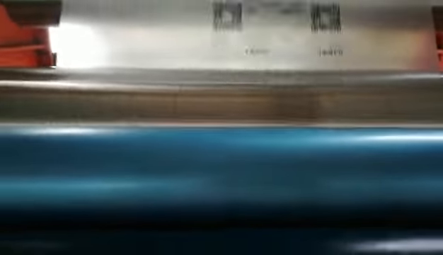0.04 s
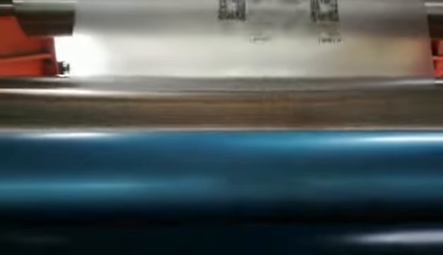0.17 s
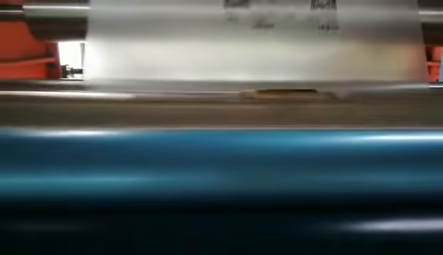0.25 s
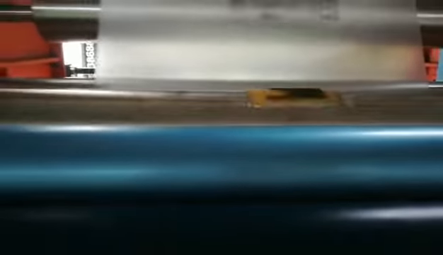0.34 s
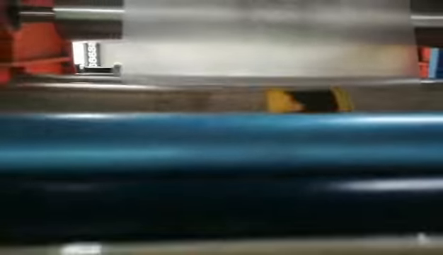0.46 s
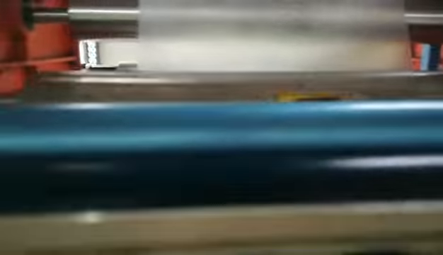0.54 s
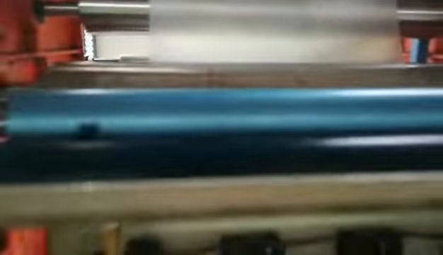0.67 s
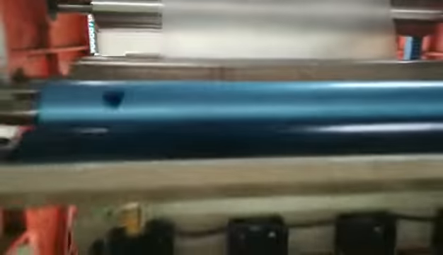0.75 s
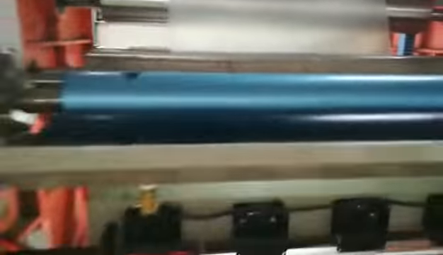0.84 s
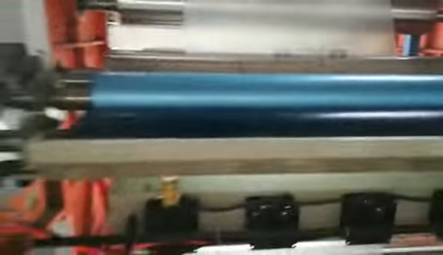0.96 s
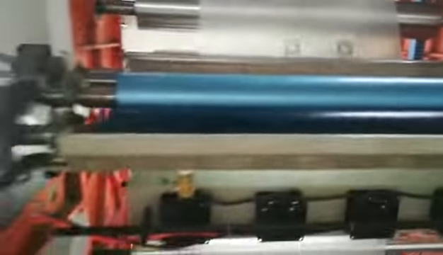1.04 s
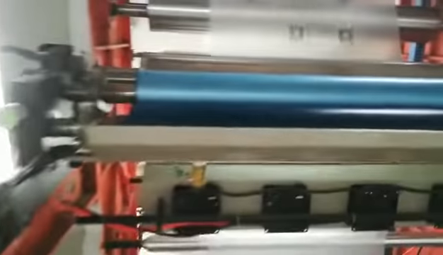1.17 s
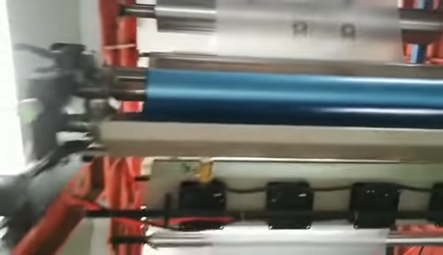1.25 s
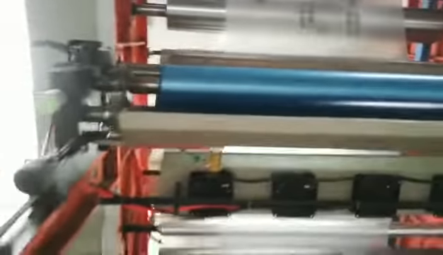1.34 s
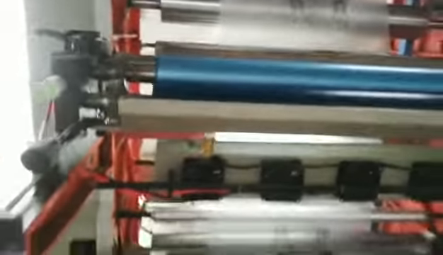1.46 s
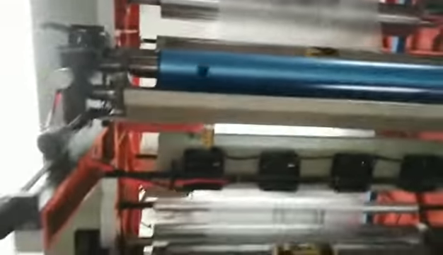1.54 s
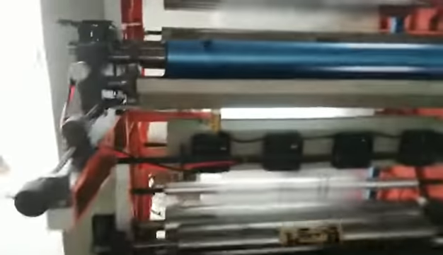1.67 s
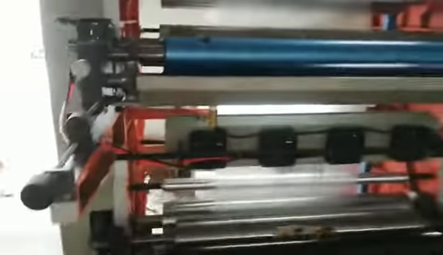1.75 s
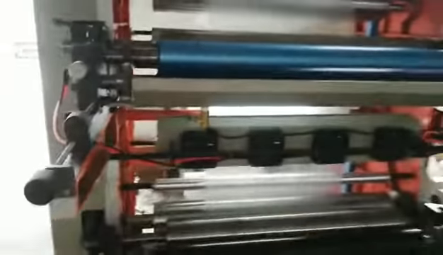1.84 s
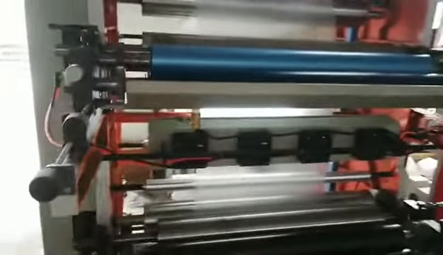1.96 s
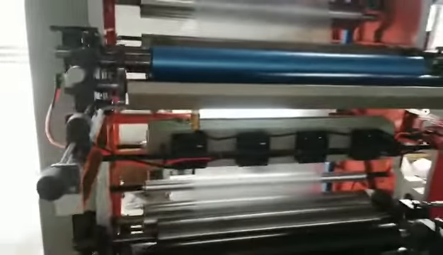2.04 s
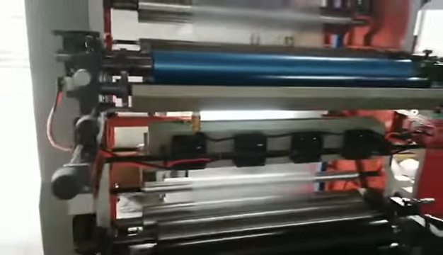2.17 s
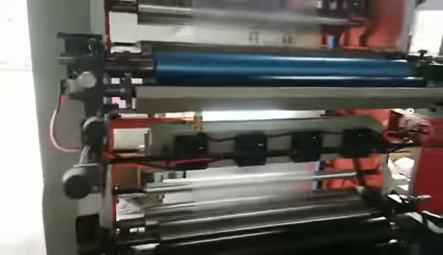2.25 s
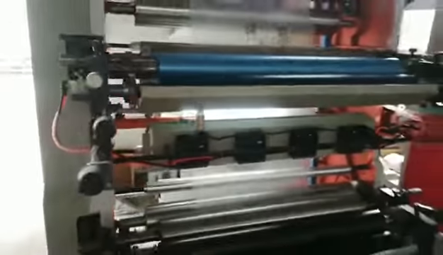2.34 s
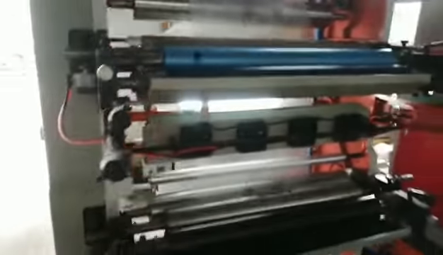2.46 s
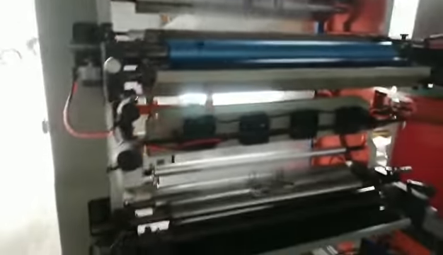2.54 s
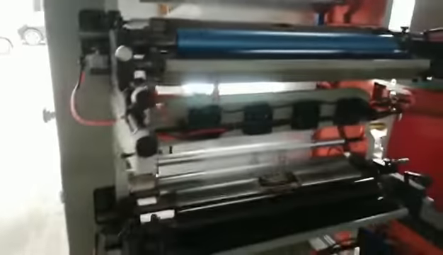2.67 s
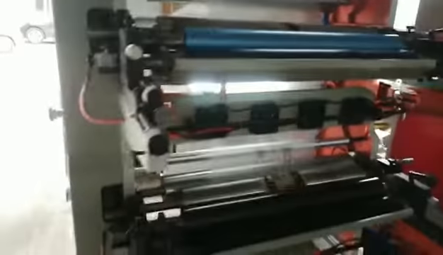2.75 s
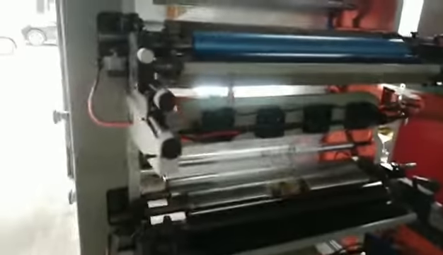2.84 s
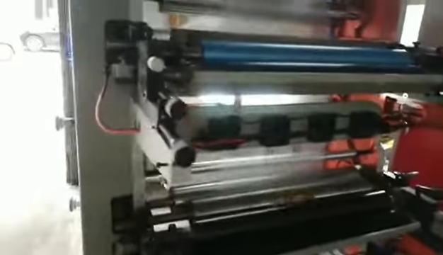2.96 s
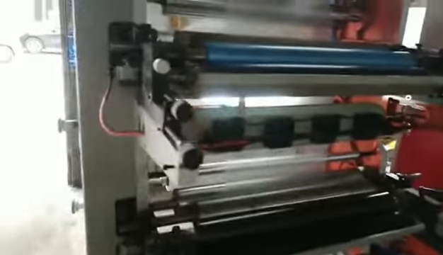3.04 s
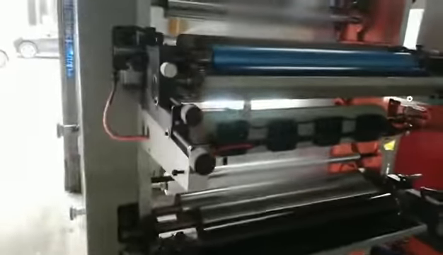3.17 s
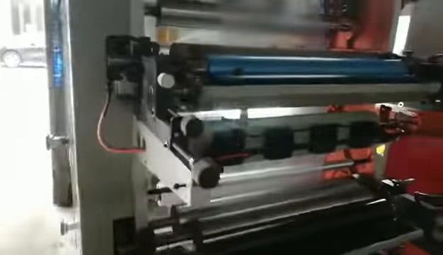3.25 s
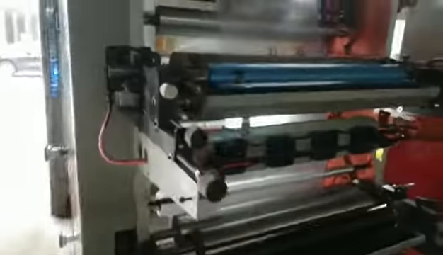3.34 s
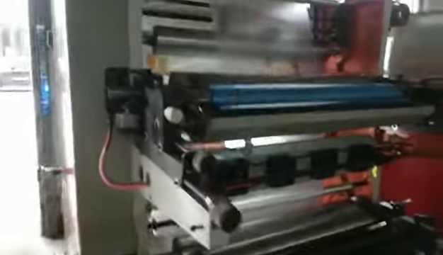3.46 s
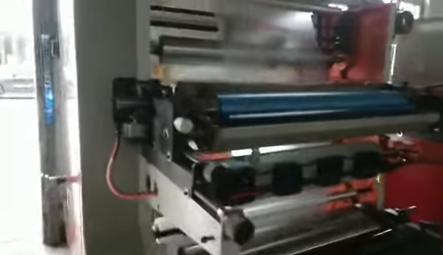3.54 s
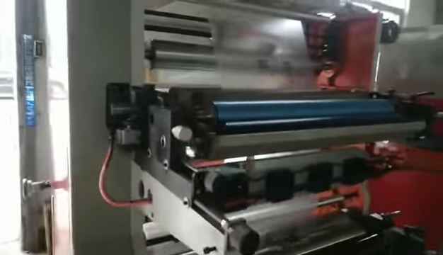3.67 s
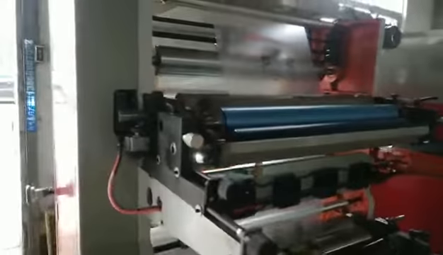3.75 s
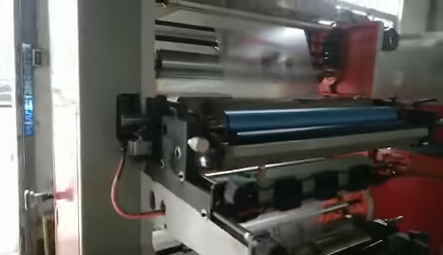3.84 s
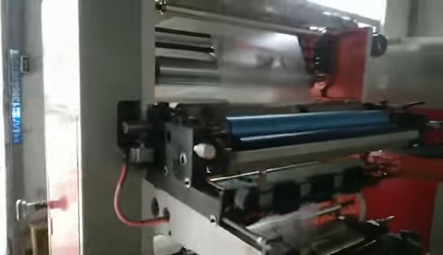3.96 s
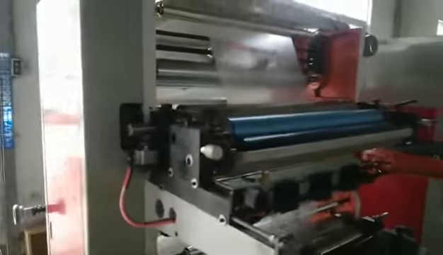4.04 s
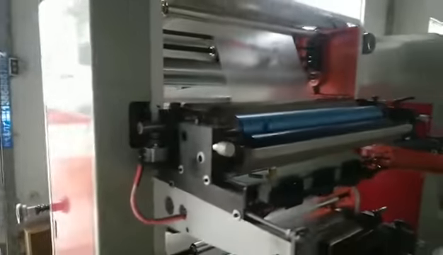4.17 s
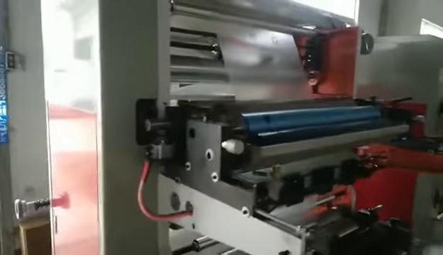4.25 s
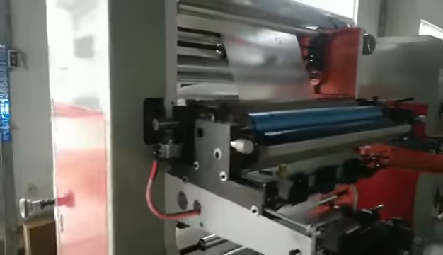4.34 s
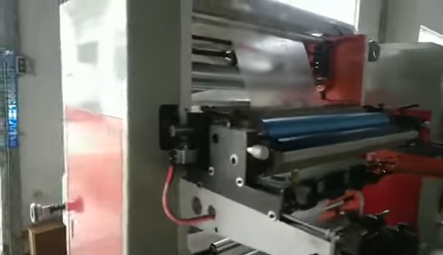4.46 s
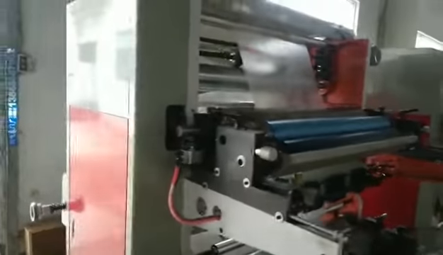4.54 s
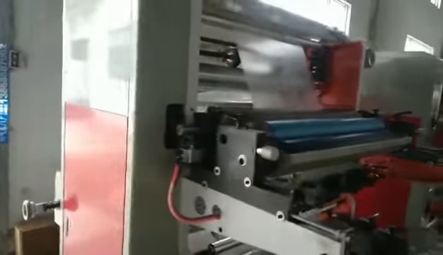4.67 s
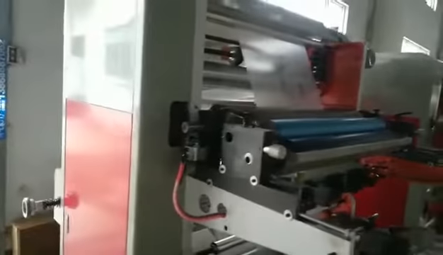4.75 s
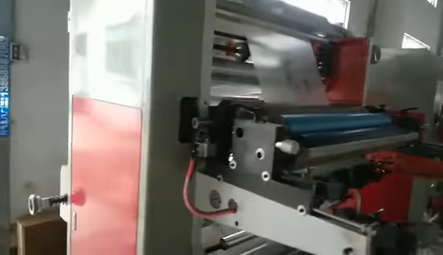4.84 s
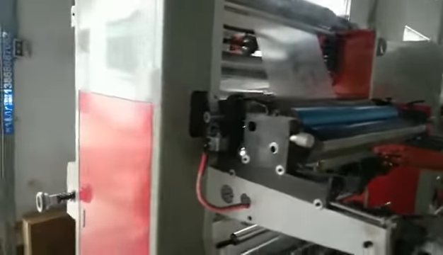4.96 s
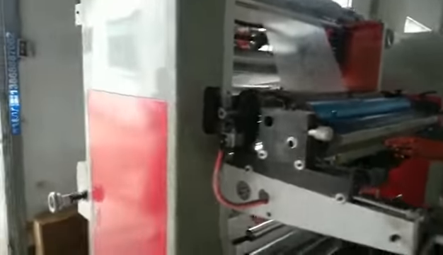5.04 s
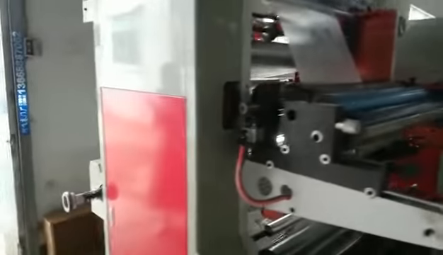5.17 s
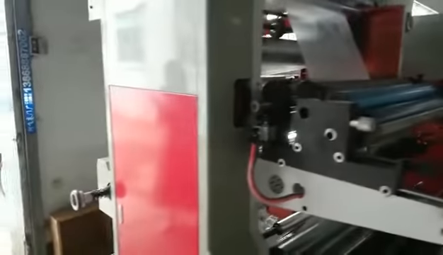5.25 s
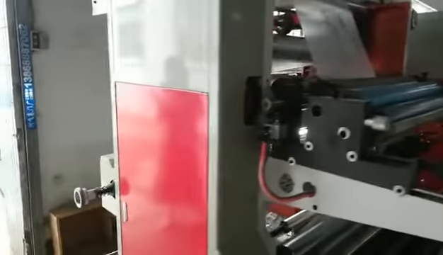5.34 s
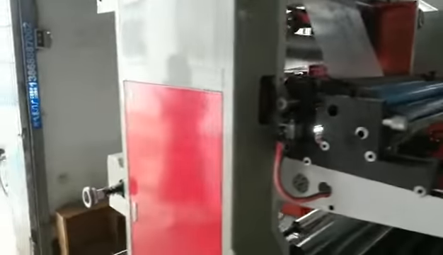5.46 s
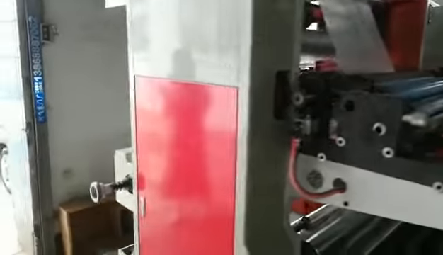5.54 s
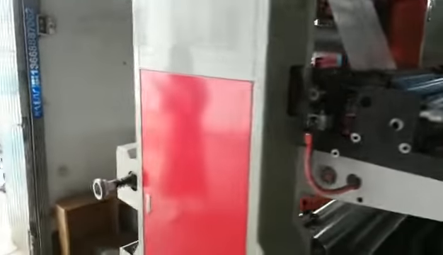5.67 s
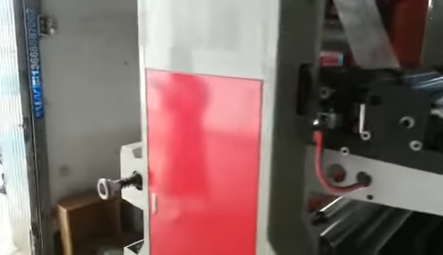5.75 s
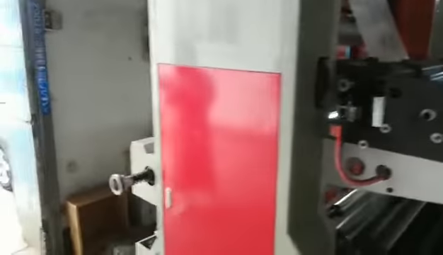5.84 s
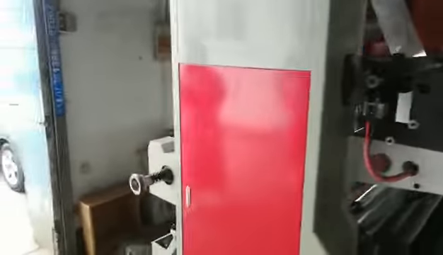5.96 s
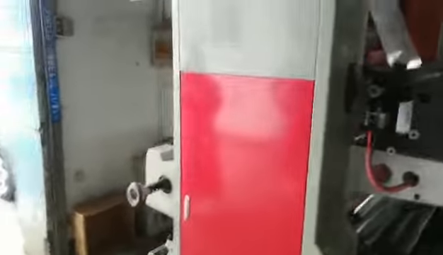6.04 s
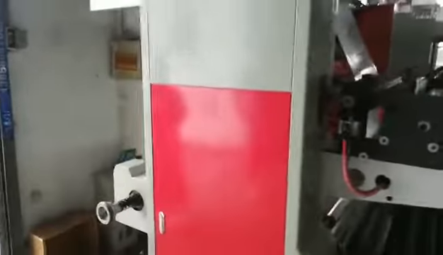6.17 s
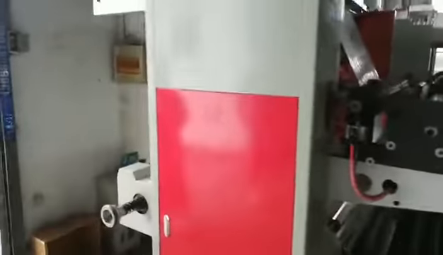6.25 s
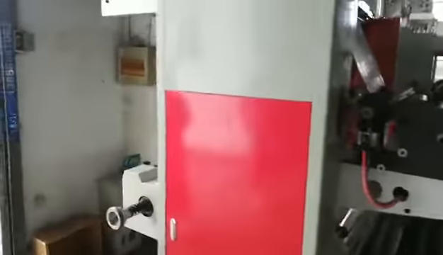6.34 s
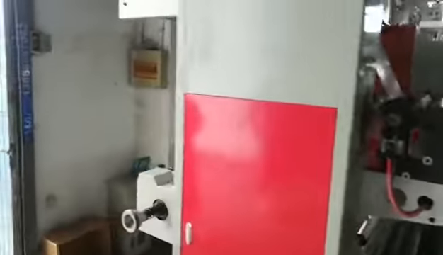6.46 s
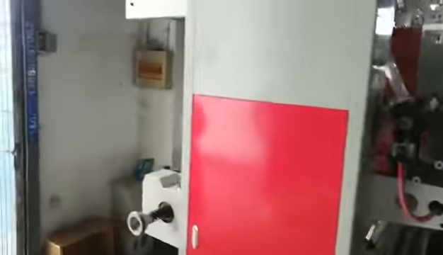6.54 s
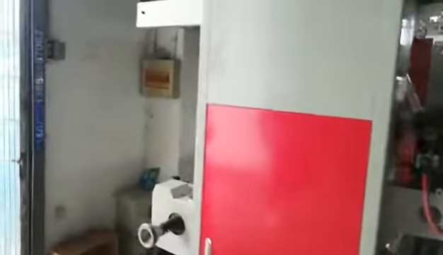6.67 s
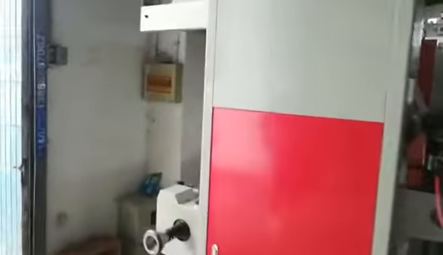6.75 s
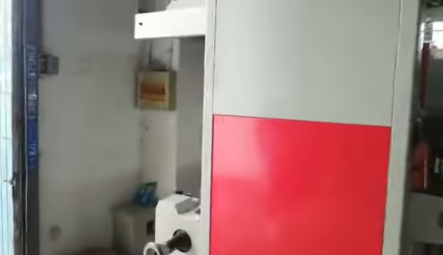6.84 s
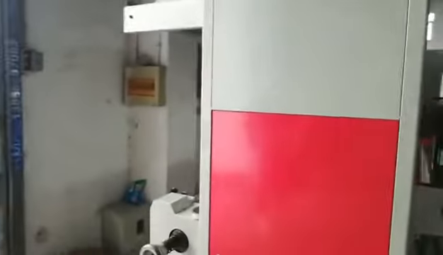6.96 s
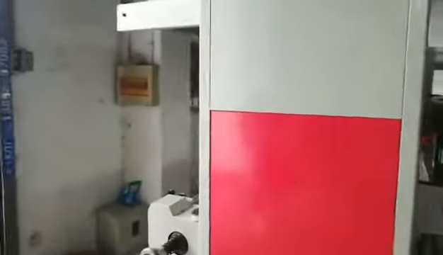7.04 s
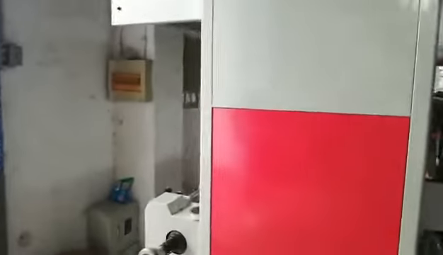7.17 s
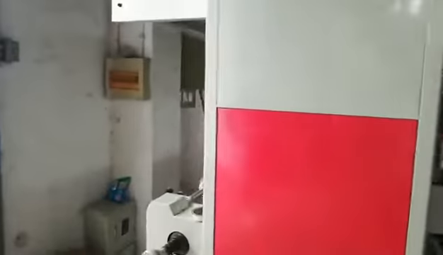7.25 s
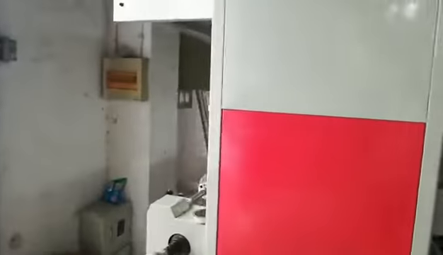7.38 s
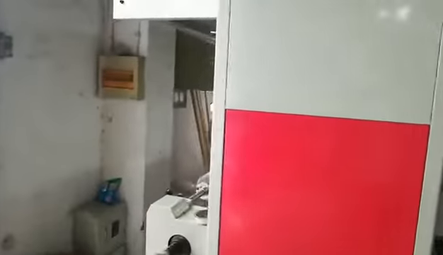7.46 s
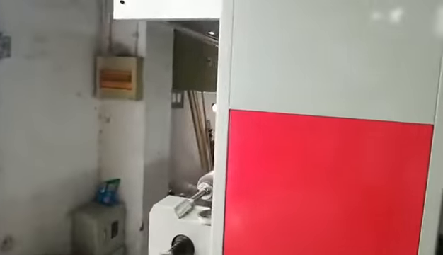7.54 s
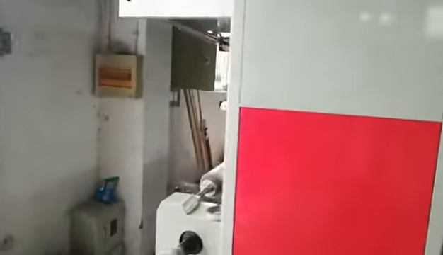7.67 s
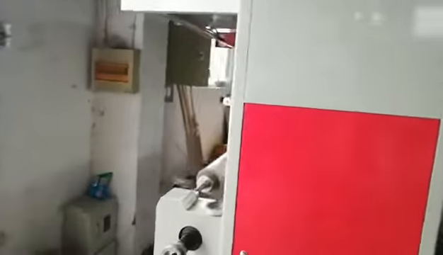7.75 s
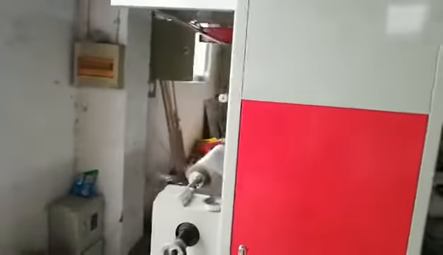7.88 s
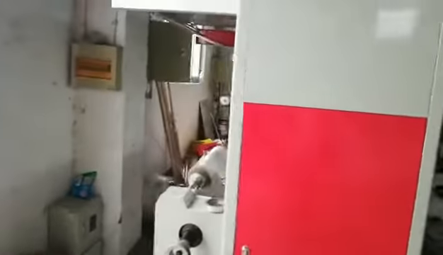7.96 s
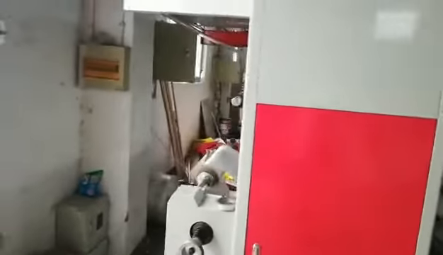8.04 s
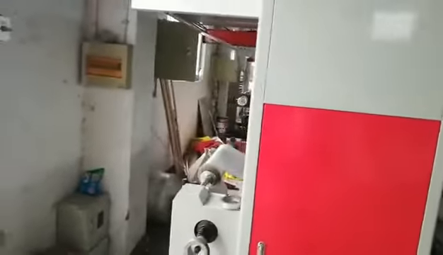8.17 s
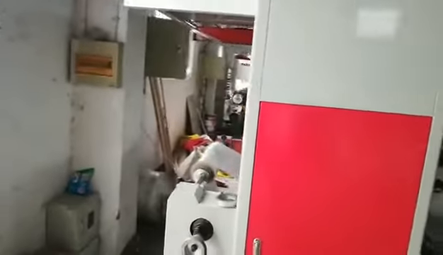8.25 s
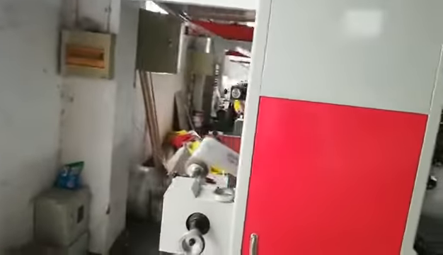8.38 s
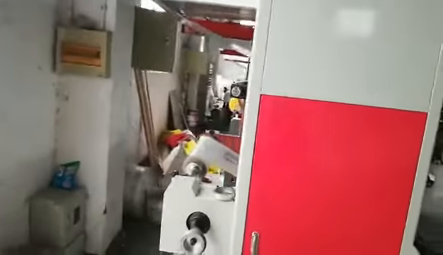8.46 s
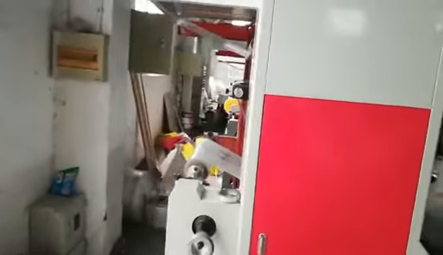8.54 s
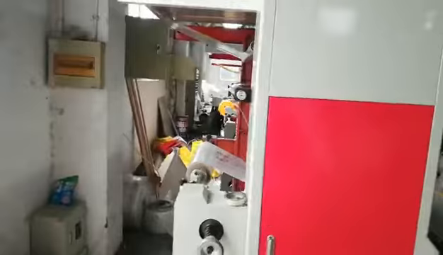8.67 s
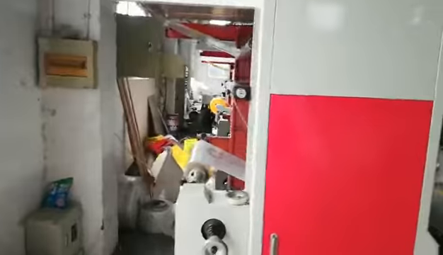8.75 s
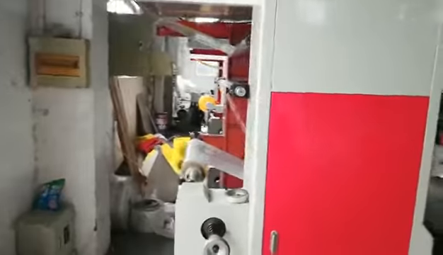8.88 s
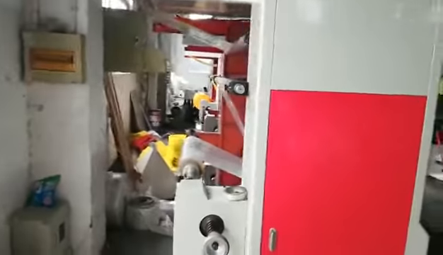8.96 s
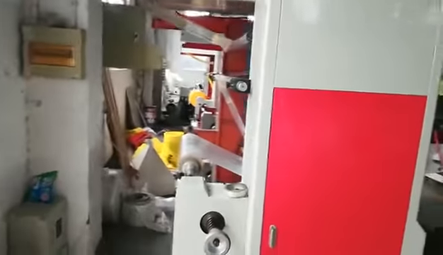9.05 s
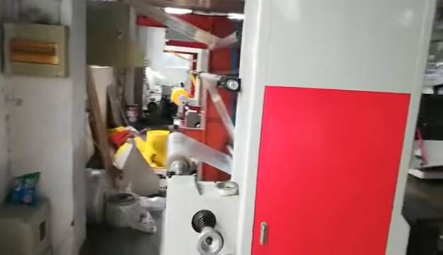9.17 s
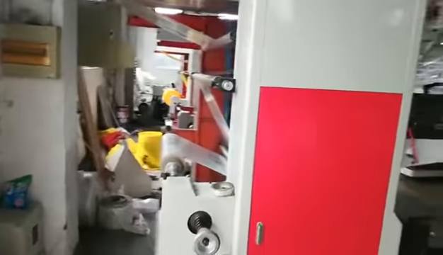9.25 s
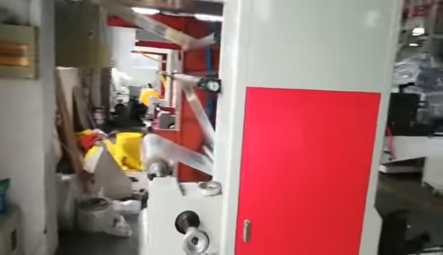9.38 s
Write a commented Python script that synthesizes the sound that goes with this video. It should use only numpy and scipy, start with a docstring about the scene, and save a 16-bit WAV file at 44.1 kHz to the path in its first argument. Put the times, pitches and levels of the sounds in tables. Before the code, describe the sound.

A film printing press hums and roars steadily in a workshop, its throbbing hum easing as the microphone backs away, with thin whine and brief roller squeaks.

```python
"""A loud hum throbs in the roar of a film printing press, then eases as the microphone backs off the rollers.
Shaft-order sines make the hum, which sags with each turn of the printing cylinder; shaped noise makes
the frame's rumble, the roar of bearings and gears, and the film's hiss. Dry-roller squeaks are short fuzzy tones.
The inverter whines, a fan drones, and a lower drone rises. Later the microphone passes behind a steel cabinet.
"""
import sys
import numpy as np
from scipy import signal
from scipy.fft import rfft, irfft
from scipy.io import wavfile
from scipy.ndimage import uniform_filter1d

SR = 44100
rng = np.random.default_rng(int(sys.argv[2]) if len(sys.argv) > 2 else 0)


def pcm_store(signal):
    """Save signal as 16-bit PCM."""
    levels = np.round(np.clip(np.atleast_2d(signal), -1, 1) * 32767)
    wavfile.write(sys.argv[1], SR, levels.astype(np.int16).T)


N = 414981
T = np.arange(N) / SR
FRAME_T = np.arange(N // 512 + 5) * 512 / SR
BIN_HZ = np.fft.rfftfreq(2048, 1 / SR)
BACKED_OFF_S = 3.4


# Machinery loudness along the walk, before trims. Each row: time in seconds, roar in dB, film hiss in dB.
WALK_LEVELS = [(0, -29, -32.5), (1.3, -30.5, -34), (3.3, -32, -35.5), (5, -32, -35.5), (6.5, -33, -37),
               (8.5, -33.5, -38), (9.41, -33, -37.5)]
# Frame rumble spectrum. Each row: frequency in Hz, relative density in dB.
FRAME_SPECTRUM = [(10, -24), (25, -6.5), (45, -3.5), (70, -3), (105, 0), (150, 2), (200, 3), (260, -0.5),
                  (330, -2.5), (400, -3), (520, -13.5), (900, -37)]
# Bearing and gear roar spectrum. Each row: frequency in Hz, relative density in dB.
ROLLER_SPECTRUM = [(200, -33), (400, -5), (520, 1), (610, 2), (850, 1), (1050, 1), (1350, -1), (1620, -0.5),
                   (1900, -3), (2100, -3.5), (2500, -9), (3000, -13.5), (4500, -36)]
# Film hiss spectrum. Each row: frequency in Hz, relative density in dB.
FILM_SPECTRUM = [(1800, -25.5), (2600, -10.5), (3100, -7), (3700, -1), (4300, -3), (4800, -1.5),
                 (5350, -4.5), (5900, -3), (6250, 0.5), (6420, -2), (6800, 1), (7050, -3), (7450, -7.5),
                 (8000, -24)]


def machinery(frame_trim_db=-1.07, frame_fade_db_per_s=0.22, rollers_trim_db=-0.3, film_trim_db=-0.05,
              chatter_db=0.5, flap_db=0.52):
    """The frame rumbles, bearings and gears roar and chatter, and flapping film hisses off the rollers."""
    roar_db, hiss_db = curve(WALK_LEVELS, T)
    frame_db = roar_db + frame_trim_db - frame_fade_db_per_s * T
    rollers_db = roar_db + rollers_trim_db + chatter_db * wander(rate_hz=65)
    film_db = hiss_db + film_trim_db + flap_db * wander(rate_hz=32)
    frame = rush(FRAME_SPECTRUM, frame_db, patchy_db=1, ripple_db=1.5)
    rollers = rush(ROLLER_SPECTRUM, rollers_db, patchy_db=1.0, ripple_db=1.83)
    film = rush(FILM_SPECTRUM, film_db, patchy_db=1.5, ripple_db=2.0)
    return frame + rollers + film


# Likeness of the two ports. Each row: frequency in Hz, base correlation, phase lag of the left port in rad.
PORT_LIKENESS = [(50, .997, 0), (100, .98, 0), (150, .88, .05), (220, .85, .05), (330, .84, .15),
                 (440, .55, 1), (580, .5, 1.45), (780, .2, 0), (1100, .5, -.15), (1600, .47, -.15),
                 (1880, .05, 0), (2200, .04, 0), (3900, .005, 0), (7500, .002, 0)]
# Direction of low sound. Each row: time in seconds, nominal left-port lag in s, diffuseness (1 = usual).
BEARING_PATH = [(0, 0, 1.5), (.7, 0, 0.96), (1.3, 0.00057, 1), (2.3, 0, 0.83), (3.4, 0, .6),
                (4.5, 0.000025, 0.82), (5.3, 0, 1.1), (6.2, 0.00026, 1.9), (7.25, 0.00047, 1.7),
                (7.8, 0.00012, 1.8), (8.5, 0.00052, 1), (9.41, 0.00015, 0.54)]
# Left minus right in the open. Each row: frequency in Hz, difference in dB.
OPEN_TILT = [(350, 0), (600, -3.5), (780, -2.5), (1100, -1.5), (2200, 1), (3200, -4.5), (3700, -2.5),
             (4400, 1.5), (5400, -0.5), (6000, -4.5), (6600, -10.5), (7500, -2.5)]
# Full cabinet effect on each port. Each row: frequency in Hz, left in dB, right in dB.
CABINET_SHADE = [(300, 2, 3), (704, -2, -3), (1120, -0.5, 0), (1800, -7.5, 4.5), (2400, -3, 3),
                 (3220, 4, 1.5), (4000, -5.5, 1.5), (5000, -5.5, -1.5), (6640, -1.5, -0.5),
                 (7400, -0.5, 1.5)]
# Full colour of closeness to the rollers. Each row: frequency in Hz, boost in dB.
CLOSENESS = [(40, -14), (150, 1), (300, -6), (450, -1), (680, -5), (1000, 0.5), (1800, 2), (2800, 5),
             (4500, -4.5), (7000, 0)]
CLOSE_SHARE = 0.45
HIDDEN_SHARE, HIDING_FROM_S, HIDDEN_BY_S = 0.76, 5.9, 6.35
BENDS_FROM_HZ, BENDS_BELOW_HZ = 170, 300
PORT_RIPPLE_DB, PORTS_DIFFER_HZ = 1.23, 1500
RUMBLE_HZ, RUMBLE_WIDTH_HZ = 50, 35


def rush(spectrum, level_db, patchy_db, ripple_db):
    """Noise of one part of the press: shaped STFT bins, partly correlated between the two ports."""
    a, b, c, d = rng.standard_normal((4, len(FRAME_T), len(BIN_HZ)))
    left, other = a + 1j * b, c + 1j * d
    likeness, lag_rad = colour(PORT_LIKENESS)
    lag_s, diffuse = curve(BEARING_PATH, FRAME_T)[:, :, None]
    same = np.clip(likeness, 0, 1) ** np.abs(diffuse)
    bend = ramp(BIN_HZ, 0, BENDS_FROM_HZ) / (1 + (BIN_HZ / BENDS_BELOW_HZ) ** 4)  # the lag acts on low bins
    lag_rad = lag_rad + 2 * np.pi * BIN_HZ * lag_s * bend
    right = np.exp(1j * lag_rad) * (same * left + np.sqrt(1 - same ** 2) * other)

    close = CLOSE_SHARE * (1 - ramp(FRAME_T[:, None], 0, BACKED_OFF_S))
    hidden = HIDDEN_SHARE * ramp(FRAME_T[:, None], HIDING_FROM_S, HIDDEN_BY_S)
    db = colour(spectrum) + patchy_db * blotches(frames=6, bins=12)  # uneven rubbing
    # narrow bands of the noise swell and dip at random, higher ones also differently at each port
    shared = blotches(frames=30, bins=2)
    apart = blotches(frames=20, bins=2) * ramp(BIN_HZ, 0, PORTS_DIFFER_HZ)
    db = db + ripple_db * shared + PORT_RIPPLE_DB * np.array([apart, -apart])
    db = db + close * colour(CLOSENESS) + local_swells()
    db = db + rumbling(FRAME_T[:, None]) * bump(BIN_HZ, RUMBLE_HZ, RUMBLE_WIDTH_HZ)
    tilt = colour(OPEN_TILT)
    db = db + np.array([tilt, -tilt]) / 2 + hidden * colour(CABINET_SHADE)[:, None]

    bins = np.array([left, right]) * gain_of(db)
    x = signal.istft(bins, nperseg=2048, noverlap=1536, time_axis=1, freq_axis=2)[1][:, :N]
    return gain_of(level_db) * x / np.std(x.mean(0))


# Local swells and dips in the noise, some gliding in pitch.
# Each row: time of peak in seconds, reach in s, pitch at peak in Hz, glide in Hz per s, width in Hz, boost in dB.
LOCAL_SWELLS = [(.15, 0.4, 758, 1.5, 28, 10.5), (1.1, 1.4, 435, 13.5, 24, 7.5),
                (1.4, 0.93, 600, 68.5, 30, 7.5), (2.2, 0.78, 1590, 128, 76, 4), (4.1, 3, 321.5, 0.5, 38, 6),
                (1.8, 1.4, 873, 0, 140, -2.5), (4.8, 0.54, 2280, -0.5, 220, 3),
                (9.2, 0.26, 1200, 1, 55, 2.5), (.2, 0.31, 150, 2.5, 30, 0), (0.83, .45, 810, 0.5, 80, -2.5),
                (.6, 1, 1930, 0.5, 59, -2.5), (7.3, .8, 1900, 0.5, 80, -1.5), (.7, 1.3, 300, 1.5, 37, 4),
                (.2, .5, 550, -0.5, 50, 3.5), (7, 1, 365, 19.5, 26, 4), (6.9, .8, 650, -2.5, 150, -2),
                (9.1, .7, 235, 1, 25, 2.5), (9.1, .6, 720, 0, 90, -3), (4.4, .6, 900, 0, 76, -2.5),
                (2, 1.2, 1050, 0.5, 120, -1), (3.7, .6, 3300, 0, 400, 1.5), (3.9, 1, 500, 0.5, 39, 1),
                (5.2, .35, 180, 0, 25, -3)]


def local_swells():
    """Boost in dB, by frame and bin, from local swells and dips in the noise."""
    t = FRAME_T[:, None]
    return sum(db * bump(t, s, reach_s) * bump(BIN_HZ, hz + glide * (t - s), width_hz)
               for s, reach_s, hz, glide, width_hz, db in LOCAL_SWELLS)


# Swells and ebbs of the low rumble. Each row: time in seconds, boost in dB.
RUMBLE_SWELLS = [(1, 10), (2.6, 5.5), (1.9, -2.5), (3.87, 4), (4.3, 2.5), (4.88, 5.5), (6.75, -6),
                 (7.58, 8), (8.2, 3.5), (8.72, 9.5), (9.25, 3.5)]
RUMBLE_REACH_S = .17


def rumbling(t):
    """Boost in dB from brief swells and ebbs of the low rumble."""
    return sum(db * bump(t, s, RUMBLE_REACH_S) for s, db in RUMBLE_SWELLS)


# Strong shaft orders along the walk, before trims. Each row: time in seconds, 4th order in dB, 6th order in dB.
STRONG_ORDERS = [(0, -37, -22), (.2, -27.5, -24.5), (.4, -28, -27), (.52, -32.5, -32.5), (.7, -32, -33),
                 (.82, -33, -29.5), (1.12, -29.5, -31.5), (1.28, -31.5, -29.5), (1.6, -30.5, -34.5),
                 (2.2, -31.5, -34), (2.7, -31, -32.5), (3.5, -32.5, -35), (4.6, -32.5, -33),
                 (5, -34.5, -43), (5.75, -32, -36), (6.5, -33.5, -37.5), (6.9, -31, -41), (7.5, -34, -39),
                 (8.3, -36, -37.5), (9.41, -41, -36)]
# Sags per cylinder turn; negative depths swell.
# Each row: time in seconds, 4th order depth in dB, 6th order depth in dB.
CYLINDER_SAGS = [(.9, -1, 3), (2.06, 7, 6), (3.24, 6.5, 10), (4.209, 8.5, 3), (5.55, 3.5, 5), (6.7, 11, 3),
                 (7.819, 2.5, 8), (9, 3, 3)]
# Weaker shaft orders, each swelling at a standing-wave crest.
# Each row: multiple of shaft speed, base level in dB, crest time in s, swell in dB.
WEAK_ORDERS = [(2, -49.5, 4.1, 7.5), (3, -52, 4.1, 5.5), (5, -49.5, 8.5, 10), (8, -46.5, 4.2, 9),
               (10, -56, 1.8, 9)]
SHAFT_HZ, FOURTH, SIXTH = 27.58, 4, 6
SAG_REACH_S, SIXTH_EARLY_S, DRAG_REACH_S = .14, .23, .28
THROB_UNTIL_S, CREST_REACH_S = 1.1, 1.6


def motor(waver_share=0.003095, fourth_trim_db=-0.44, sixth_trim_db=-1.7, unsteady_db=0.67, flutter_db=1.5,
          drag_s=0.0021, throb_rms=0.2):
    """Orders of one shaft wavering with the film's pull; the strong ones sag with each cylinder turn."""
    hz = SHAFT_HZ * (1 + waver_share * wander(rate_hz=3.1))
    fourth_db, sixth_db = curve(STRONG_ORDERS, T)
    fourth_db = fourth_db - sum(depth * bump(T, s, SAG_REACH_S) for s, depth, _ in CYLINDER_SAGS)
    sixth_db = sixth_db - sum(depth * bump(T, s - SIXTH_EARLY_S, SAG_REACH_S) for s, _, depth in CYLINDER_SAGS)
    fourth_db = fourth_db + fourth_trim_db + unsteady_db * wander(rate_hz=6.3)
    sixth_db = sixth_db + sixth_trim_db + unsteady_db * wander(rate_hz=15)

    # the 4th order drags, then catches up
    behind_s = drag_s * sum(bump(T, s, DRAG_REACH_S) for s, _, _ in CYLINDER_SAGS)
    hum = gain_of(fourth_db) * sine(FOURTH * hz * (1 - np.gradient(behind_s, T)))
    hum += gain_of(sixth_db) * sine(SIXTH * hz)
    hum *= 1 + throb_rms * (1 - ramp(T, 0, THROB_UNTIL_S)) * sine(hz)  # close up, each shaft turn throbs
    for order, base_db, crest_s, swell_db in WEAK_ORDERS:
        db = base_db + swell_db * bump(T, crest_s, CREST_REACH_S) + flutter_db * wander(rate_hz=3.1)
        hum += gain_of(db) * sine(order * hz)
    return from_right(hum)


# Whine at the left port, before trim, through standing waves. Each row: time in seconds, level in dB.
WHINE_LEFT_LEVELS = [(0, -35), (.35, -36), (.45, -47), (.8, -46), (1.1, -43), (1.24, -48), (1.45, -32),
                     (1.65, -45), (2, -49), (2.25, -43), (2.75, -58), (3, -40.5), (4, -54.5), (4.3, -39.5),
                     (4.85, -49), (5.8, -52), (6.2, -55), (6.9, -54), (7.35, -46.5), (7.8, -60),
                     (8.55, -50), (8.85, -40), (9.05, -56), (9.41, -55)]
# Whine at the right port, before trim. Each row: time in seconds, level in dB.
WHINE_RIGHT_LEVELS = [(0, -48.5), (.55, -44.5), (.75, -38.5), (1.15, -33.5), (1.4, -35.5), (1.55, -45),
                      (1.85, -42), (2.35, -51), (2.85, -41.5), (3.15, -46), (3.75, -42), (4.1, -48),
                      (5.3, -43.5), (6, -49), (6.85, -46), (7.3, -48), (7.45, -38), (7.6, -34), (7.74, -50),
                      (8, -56), (8.2, -42), (8.45, -48), (8.95, -53), (9.1, -43), (9.41, -35)]
# Pitches of the drive's fainter whistles, in Hz.
WHISTLE_PITCHES_HZ = [3947, 4065, 6741]
# One row per whistle pitch. Each row: fuzz width in Hz, level in dB before the port split.
WHISTLE_SHAPES = [(8, -62.5), (14, -62.5), (20, -53)]
WHINE_HZ, WHINE_RISE_HZ, WHINE_RISEN_S = 2027.5, 2.8, 3


def inverter(whine_trim_db=-0.9, waver_hz=0.62, roaming_rad=1.0, flutter_db=0.8):
    """A thin whine with its own level and phase at each port as the microphone moves, plus fuzzy whistles."""
    hz = WHINE_HZ + WHINE_RISE_HZ * ramp(T, 0, WHINE_RISEN_S) + waver_hz * wander(rate_hz=5.1)
    phase = 2 * np.pi * np.cumsum(hz) / SR
    apart_rad = roaming_rad * wander(rate_hz=0.81) * ramp(T, 0, BACKED_OFF_S)
    whine = []
    for levels, side in ((WHINE_LEFT_LEVELS, 1), (WHINE_RIGHT_LEVELS, -1)):
        db = curve(levels, T)[0] + whine_trim_db + flutter_db * wander(rate_hz=5)
        whine.append(gain_of(db) * np.sqrt(2) * np.sin(phase + side * apart_rad / 2))
    whistles = sum(gain_of(db) * whistle(pitch_hz, width_hz, steady=.1)
                   for pitch_hz, (width_hz, db) in zip(WHISTLE_PITCHES_HZ, WHISTLE_SHAPES))
    return np.array(whine) + whistles * ports(right_db=12.0)


FAN_HZ, FAN_DB = 236.7, -40.5
CABINET_PASSED_S, CABINET_REACH_S = 7.22, 0.98
DRONE_IDLE_HZ, DRONE_START_S, DRONE_HZ_PER_S = 50.7, 2.7, 3.5
DRONE_DB, DRONE_LOUDEST_S, DRONE_RISE_DB_PER_S, DRONE_FALL_DB_PER_S = -43, 3.4, 8, 1.5


def fan_and_drone(shaded_db=7, rumble_share=0.38):
    """A fan's blade tone, briefly shaded by the cabinet, and a low drone that swells, rises and fades."""
    shade_db = shaded_db * bump(T, CABINET_PASSED_S, CABINET_REACH_S)
    fan_db = FAN_DB - shade_db + 1.1 * wander(rate_hz=0.65)
    fan = gain_of(fan_db) * sine(FAN_HZ + 0.42 * wander(rate_hz=1.8))
    drone_hz = DRONE_IDLE_HZ + DRONE_HZ_PER_S * np.maximum(T - DRONE_START_S, 0)
    since_s = T - DRONE_LOUDEST_S
    drone_db = DRONE_DB + np.minimum(DRONE_RISE_DB_PER_S * since_s, -DRONE_FALL_DB_PER_S * since_s)
    drone_db = drone_db + rumble_share * rumbling(T) + 1.2 * wander(rate_hz=4)
    return from_right(fan + gain_of(drone_db) * sine(drone_hz))


# Roller squeaks. Each row: start in seconds, length before release in s, pitch in Hz, glide in Hz per s,
# fuzz width in Hz, level in dB before trim and envelope.
ROLLER_SQUEAKS = [(3, 0.071, 1940, 0, 30, -45), (2.8, .2, 2380, 0, 25, -47.5),
                  (4.293, 0.059, 1900, 150, 60, -35), (4.32, 0.076, 2055, 750, 25, -39),
                  (4.727, 0.26, 3955, 0, 45, -43.5), (4.72, .18, 3160, 0, 110, -47),
                  (4.73, 0.082, 1850, 0, 140, -39), (4.75, .25, 2480, 0, 90, -54),
                  (5.88, .08, 2088, 0, 28, -43), (6.45, 0.11, 2190, 0, 25, -43),
                  (6.45, 0.11, 2350, 0, 25, -51), (6.446, 0.15, 3650, 0, 30, -50),
                  (6.7, 0.25, 2220, 3, 50, -50), (6.698, 0.2, 2350, 0, 25, -50),
                  (6.95, .1, 3300, 0, 25, -55), (7.12, .2, 3700, 0, 25, -51)]
SQUEAK_TRIM_DB = 0.5


def squeaks(attack_s=0.019, release_s=.08, fall_db=5, right_db=2):
    """A dry roller sticks and slips: narrow, fuzzy tones swell, sometimes slide up, and die away."""
    out = np.zeros((2, N))
    for s, length_s, hz, glide, width_hz, db in ROLLER_SQUEAKS:
        t = np.clip(T - s, 0, length_s + release_s)
        envelope = ramp(t, 0, attack_s) * (1 - ramp(t, length_s, length_s + release_s))
        swell = gain_of(db + fall_db * (.5 - (t / length_s) ** 2)) * envelope
        out += swell * whistle(hz + glide * t, width_hz, steady=0.4)
    return out * ports(right_db) * gain_of(SQUEAK_TRIM_DB)


def sine(hz):
    """A tone of rms 1 that follows a pitch curve."""
    return np.sqrt(2) * np.sin(2 * np.pi * (np.cumsum(hz) / SR + rng.random()))


def whistle(hz, width_hz, steady):
    """A tone of rms 1 at each port: a steady share, and fuzz that wavers differently at each port."""
    fuzz = np.array([wander(width_hz / 2) + 1j * wander(width_hz / 2) for port in range(2)])
    steady = np.clip(steady, 0, 1)
    carrier = np.exp(2j * np.pi * np.cumsum(hz * np.ones(N)) / SR)
    return ((np.sqrt(2 * steady) + np.sqrt(1 - steady) * fuzz) * carrier).real


def from_right(x, lag_share=0.62):
    """A low tone from the right: it reaches the left port late, by a lag that shifts as the microphone turns."""
    lag_s = lag_share * curve(BEARING_PATH, T)[0]
    return np.array([np.interp(T - lag_s / 2, T, x), np.interp(T + lag_s / 2, T, x)])


def ports(right_db):
    """Gains of the left and right port for a sound that favours the right."""
    return gain_of([[-right_db / 2], [right_db / 2]])


def wander(rate_hz):
    """Slow random drift of rms 1, up to about the given rate."""
    steps = np.arange(0, 16, 1 / 512)
    hz = np.fft.rfftfreq(len(steps), steps[1])
    slow = irfft(rfft(rng.standard_normal(len(steps))) / (1 + (hz / rate_hz) ** 4))
    return evened(np.interp(T, steps, slow))


def blotches(frames, bins):
    """A random field of rms 1, smoothed over the given frames and bins."""
    field = rng.standard_normal((len(FRAME_T), len(BIN_HZ)))
    return evened(uniform_filter1d(uniform_filter1d(field, size=frames, axis=0), size=bins, axis=1))


def curve(rows, t):
    """The columns of a time table at the times t."""
    s, *columns = np.transpose(rows)
    return np.array([np.interp(t, s, c) for c in columns])


def colour(rows):
    """The columns of a frequency table at every bin, interpolated over log frequency."""
    hz, *columns = np.transpose(rows)
    return np.array([np.interp(np.log(BIN_HZ + 1), np.log(hz), c) for c in columns])


def ramp(t, start, end):
    """Goes evenly from 0 to 1 between start and end."""
    return np.clip((t - start) / (end - start), 0, 1)


def bump(t, middle, reach):
    """A smooth swell from 0 to 1 and back."""
    return np.exp(-((t - middle) / reach) ** 2)


def gain_of(db):
    """Decibels to amplitude."""
    return 10 ** (np.asarray(db) / 20)


def evened(x):
    """Scales to rms 1."""
    return x / np.sqrt(np.mean(x ** 2) + 1e-20)


def scene():
    """The whole press."""
    return machinery() + motor() + inverter() + fan_and_drone() + squeaks()


EDGE_HZ = 7530


def record(dry):
    """A steep low-pass removes the treble above EDGE_HZ."""
    low_pass = signal.firwin(1501, EDGE_HZ, window=("kaiser", 9), fs=SR)
    return signal.oaconvolve(dry, low_pass[None], "same", axes=1)


dry = scene()
out = record(dry)
pcm_store(out)
```